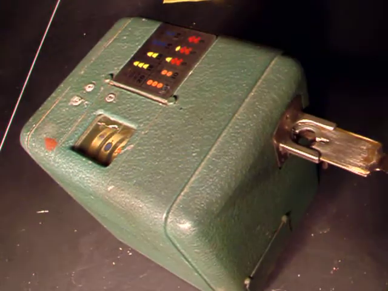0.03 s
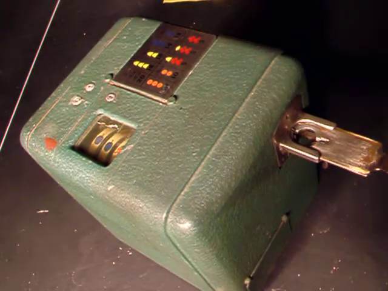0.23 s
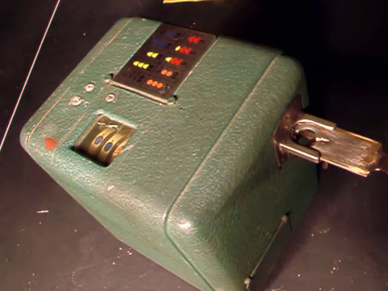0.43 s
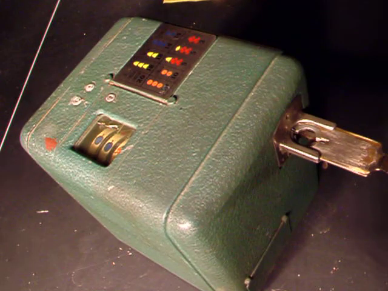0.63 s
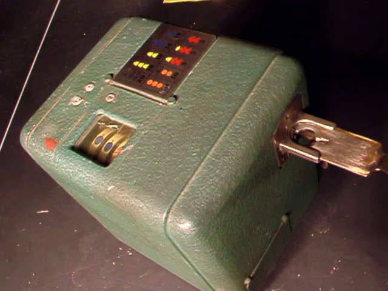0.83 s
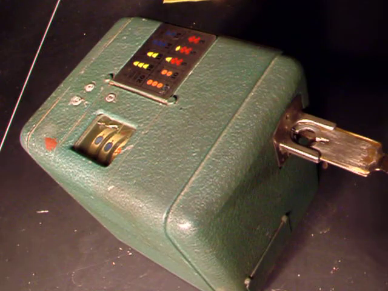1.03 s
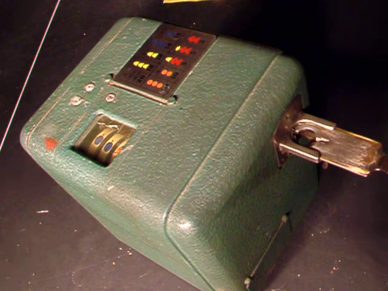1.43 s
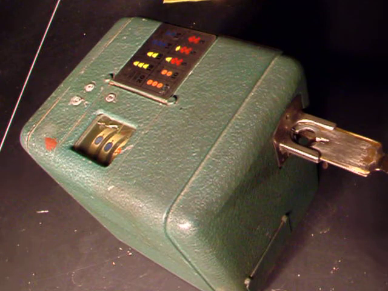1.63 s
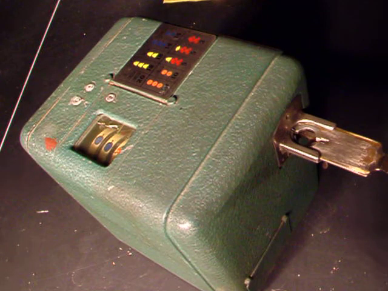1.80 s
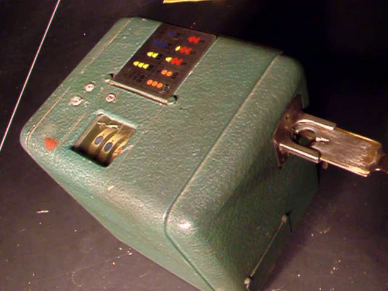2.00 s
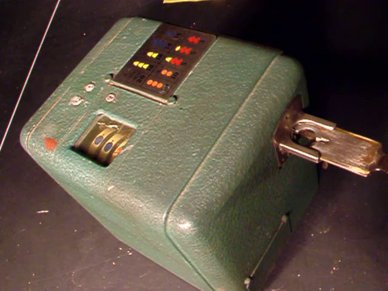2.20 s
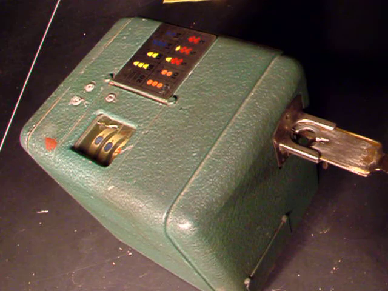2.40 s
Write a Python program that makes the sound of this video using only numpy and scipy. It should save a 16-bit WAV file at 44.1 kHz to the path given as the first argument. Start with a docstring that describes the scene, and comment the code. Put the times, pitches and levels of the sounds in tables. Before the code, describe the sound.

A small mechanical slot machine whirs softly, close by in a quiet room. At about 0.2 seconds its latch releases with a sharp double metal clack. The rattling whir swells around 0.8 seconds, catches lightly and dies away by 1.1. Seven ringing ticks follow, ever more widely spaced, the last near 2.3 seconds. Faint hiss and whine lie beneath, with a faint low hum growing toward the end.

```python
"""A small mechanical slot machine in a cast metal case, close by in a quiet room.
Its reels rub and rattle, making a whir. The lever latch lets go with a double clack,
and the whir swells and dies away. Three pawls (small arms that drop onto a toothed wheel)
then tick ever more slowly, each with its own ring, above a faint hiss, whine and hum."""
import sys
import numpy as np
from scipy import signal
from scipy.fft import rfft, irfft, next_fast_len
from scipy.io import wavfile
from scipy.ndimage import uniform_filter1d, map_coordinates

SR = 44100
rng = np.random.default_rng(int(sys.argv[2]) if len(sys.argv) > 2 else 0)


def materialize(psi):
    """Save the field psi as 16-bit PCM at rate SR to the path in sys.argv[1].

    A 1-D psi becomes a single channel; in a 2-D psi each row is a channel.
    """
    bounded = np.clip(np.atleast_2d(psi).T, -1, 1)
    quanta = np.round(bounded * 32767).astype(np.int16)
    wavfile.write(sys.argv[1], SR, quanta)


N = 112454


def amp(db):
    """Turn decibels into a number to multiply by."""
    return 10 ** (np.asarray(db) / 20)


def unit(x):
    """Scale x to an average power of 1."""
    return x / np.sqrt(np.mean(x ** 2) + 1e-20)


def along(points, hz):
    """Read between (frequency [Hz], value) points, with octaves evenly spaced."""
    frequencies, values = np.transpose(points)
    return np.interp(np.log(hz + 1), np.log(frequencies + 1), values)


def curve(rows):
    """Join (time [s], value) points with straight lines, one value per sample."""
    return np.interp(np.arange(N) / SR, *np.transpose(rows))


def wobble(rate):
    """A smooth curve through `rate` random values a second."""
    return map_coordinates(rng.standard_normal(int(N * rate / SR) + 4), [np.arange(N) * rate / SR])


def coloured(x, gain):
    """Filter x, making each frequency louder or softer by gain(hz)."""
    size = 2 * next_fast_len(len(x))
    hz = np.fft.rfftfreq(size, 1 / SR)
    cepstrum = irfft(np.log(np.maximum(gain(hz), 1e-6)), size)
    # folding it in half makes the filter ring after a sound, never before
    cepstrum[1:size // 2] *= 2
    cepstrum[size // 2 + 1:] = 0
    return irfft(rfft(x, size) * np.exp(rfft(cepstrum)), size)[:len(x)]


def evened(x, band_hz=130):
    """Make all bands of x equally strong, so that only the struck part shapes its tone."""
    power = abs(rfft(x, 2 * len(x))) ** 2
    grid = np.fft.rfftfreq(2 * len(x), 1 / SR)
    band_power = uniform_filter1d(power, size=max(1, int(band_hz / grid[1])))
    level = np.sqrt(abs(band_power) + 1e-9)
    return coloured(x, lambda hz: 1 / np.interp(hz, grid, level))


def metal_ring(force, peaks, bed):
    """Shaken metal rings at a few clear pitches (peaks) over a crowd of blended ones (the bed)."""
    def gain(hz, steepness=1.2):
        power = 0
        for centre, width, db in peaks:
            peak = (hz * width) ** 2 / ((centre ** 2 - hz ** 2) ** 2 + (hz * width) ** 2)
            power += amp(db) ** 2 * peak ** steepness
        return np.sqrt(power + amp(along(bed, hz)) ** 2)
    return coloured(force, gain)


def chatter(envelope):
    """Metal meets metal in a burst of tiny touches, whose strength follows the envelope."""
    x = rng.standard_normal(len(envelope)) * envelope
    for _ in range(6):  # even out the frequencies, then restore the shape in time
        spectrum = rfft(x)
        x = irfft(spectrum / (abs(spectrum) + 1e-12), len(x))
        x *= envelope / np.sqrt(abs(uniform_filter1d(x * x, size=64)) + 1e-12)
    return x / np.linalg.norm(x)


def room_tail(t, rise_s):
    """The room's echo: noise in which each frequency dies at its own speed."""
    # how long the room rings (frequency [Hz], time to fade by 60 dB [s])
    fade_times = [(200, 0.47), (600, 0.13), (1400, 0.24), (3700, .16), (6000, 0.17), (8500, 0.035)]
    hz, seconds, bands = signal.stft(rng.standard_normal(len(t)), SR, nperseg=256)
    fade = amp(-60 * seconds / along(fade_times, hz)[:, None])
    tail = signal.istft(bands * fade, SR, nperseg=256)[1][:len(t)]
    tail *= 1 - np.exp(-(t / rise_s) ** 2)
    return tail / np.linalg.norm(tail)


def blows(rows, peaks, bed, attack_s, release_s, room_db, room_rise_s):
    """Each blow chatters briefly against a metal part; the case and room ring on after it."""
    # ring of the case (pitch [Hz], width [Hz], level [dB])
    case_peaks = [(294, 11, -5), (783, 45, -0.5), (1115, 20, 2), (1580, 24, -1), (1610, 21, 8.5),
                  (1710, 20, -2.5), (1925, 22, -1), (2173, 18, -2), (2697, 47, -2), (4354, 13, 0),
                  (4877, 12, -8), (5330, 35, 5.5), (6050, 90, -5)]
    # blended ringing of case and room (frequency [Hz], level [dB])
    tail_bed = [(80, -31.5), (250, -13.5), (600, -14), (1000, -7), (2500, -7), (3700, -7.5), (6000, -4.5),
                (7200, -12), (8300, -22)]
    out, t = np.zeros(N + SR), np.arange(SR // 3) / SR
    # the struck part rings on in the tail too, more softly
    lingering = [(hz, width, db - 5) for hz, width, db in peaks] + list(case_peaks)
    for start_s, db, middle_db, treble_db, contact_s in rows:
        envelope = (1 - np.exp(-t / attack_s)) * np.exp(-np.maximum(t - contact_s, 0) / release_s)
        envelope *= amp(4.5 * np.exp(-t / 0.00089))  # the first touch is the hardest
        direct = metal_ring(evened(chatter(envelope)), peaks, bed)
        tail = metal_ring(evened(room_tail(t, room_rise_s)), lingering, tail_bed)
        # this blow's brightness (frequency [Hz], gain [dB])
        hardness = [(1200, 0.0033), (2000, middle_db), (3400, middle_db), (4800, treble_db)]
        blow = coloured(direct + amp(room_db) * tail, lambda hz: amp(along(hardness, hz)))
        out[round(start_s * SR):][:len(t)] += amp(db) * blow
    return out[:N]


def reels(rattles_per_s=500, low_hz=1500, stop_s=1.13):
    """The spinning reels rub and rattle in their bearings, and catch lightly as they slow."""
    # ring of the reels (pitch [Hz], width [Hz], level [dB])
    peaks = [(286, 23.5, 2), (773.5, 43, 6), (898, 20, 6), (1081, 69, -2), (1393, 25, -9), (1718, 67, -4.5),
             (1917, 13, 4.5), (2200, 77, 4), (2403, 66, 1.5), (3076, 37, 1), (3630, 110, -21),
             (4580, 190, -2.5), (5720, 63, -6), (6740, 150, -2.5)]
    # their blended ringing (frequency [Hz], level [dB])
    bed = [(60, -40), (220, -6), (400, -26), (620, -25), (900, -8.5), (2400, -8.5), (3700, -11.5),
           (5500, -10.5), (7000, -5.5), (8300, -23.5)]
    # loudness of the whir (time [s], level [dB])
    whir_levels = [(0, -43), (.12, -43.5), (.19, -44), (.33, -46), (.42, -47.5), (.5, -46.5), (.58, -48.5),
                   (.68, -45), (.77, -41), (.86, -40), (.94, -42.5), (.98, -45.5), (1.03, -56), (1.1, -55),
                   (1.2, -53.5)]
    # the whir's low part grows as the reels drag (time [s], gain [dB])
    drag = [(0, -2.5), (.6, 1.5), (.75, 2), (.93, 0), (1.05, 2.5)]
    # light catches (time [s], relative level [dB], middle [dB], treble [dB], contact length [s])
    catch_hits = [(.838, -45, -10.5, 11, 0.0096), (.906, -38, 4, 2.5, 0.0026), (1.001, -39.5, 3, 4, 0.0036)]
    knock_times = np.cumsum(rng.exponential(1 / rattles_per_s, size=1500))
    strengths = amp(2.5 * rng.standard_normal(len(knock_times)))
    knocks = np.bincount((knock_times * SR).astype(int), strengths, N)[:N]
    rubbing = rng.standard_normal(N)
    rattle = amp(-7) * unit(knocks - knocks.mean())
    flutter = amp(.9 * wobble(60))
    whir = unit(metal_ring((rubbing + rattle) * flutter, peaks, bed))
    low = signal.sosfiltfilt(signal.butter(2, low_hz, fs=SR, output="sos"), whir)
    whir = whir - low + amp(curve(drag)) * low
    catches = blows(catch_hits, peaks, bed,
                    attack_s=0.00185, release_s=0.0038, room_db=-3, room_rise_s=0.0053)
    fade_out = np.clip((stop_s - np.arange(N) / SR) / .05, 0, 1)
    return fade_out * amp(curve(whir_levels)) * whir + amp(33.5) * catches


def noise(spectrum):
    """Steady noise shaped by (frequency [Hz], relative level [dB]) points."""
    return unit(coloured(rng.standard_normal(N), lambda hz: amp(along(spectrum, hz))))


def background(hum_hz=118):
    """Room hiss, a faint wavering whine, and a low hum that grows along with a soft rumble."""
    # tone of the hiss (frequency [Hz], relative level [dB])
    hiss_shape = [(20, -11.5), (50, -18.5), (113, -17), (300, -16), (700, -16.5), (900, -13.5),
                  (1100, -16.5), (1400, -16.5), (2000, -16.5), (5200, -18.5), (6900, -16.5), (7800, -21),
                  (8900, -27)]
    # tones of the whine (pitch [Hz], level [dB])
    whine_tones = [(460, -68.5), (896, -63), (1340, -59.5), (1778, -67.5), (7115, -66.5), (7544, -68),
                   (8455, -80)]
    # growth of the hum (time [s], level [dB])
    hum_levels = [(0, -84), (1.2, -77), (1.7, -66.5), (2.1, -63.5), (2.5, -58.5)]
    # tone of the rumble (frequency [Hz], relative level [dB])
    rumble_shape = [(40, -5.5), (150, 3), (500, 2.5), (900, -5.5), (2000, -27)]
    t = np.arange(N) / SR
    whine = sum(amp(db + 0.38 * wobble(5.8)) * np.sin(2 * np.pi * hz * t + 0.4 * wobble(22))
                for hz, db in whine_tones)
    phase = 2 * np.pi * hum_hz * t + .2 * wobble(6)
    hum = np.sin(phase) + amp(-12.5) * np.sin(2 * phase)  # with a softer tone an octave up
    hiss = amp(-50.5) * noise(hiss_shape)
    rumble = amp(-0.5) * noise(rumble_shape)
    return hiss + np.sqrt(2) * whine + amp(curve(hum_levels)) * (np.sqrt(2) * hum + rumble)


def latch(boom_delay_s=.005, boom_rise_s=0.0036):
    """A small catch slips, the latch slams against its stop, and the case's panels boom just after."""
    # the two clacks (time [s], relative level [dB], middle [dB], treble [dB], contact length [s])
    slip_hit = [(.2055, -24.5, 1.5, -1.5, 0.0038)]
    slam_hit = [(.2387, -18.5, 0, -1, .005)]
    # ring of the catch and of the latch (pitch [Hz], width [Hz], level [dB])
    catch_peaks = [(730, 57, -1), (1610, 120, -2.5), (1800, 170, -0.5), (2320, 170, -6), (3580, 350, -3.5),
                   (5060, 74, 11.5), (5370, 220, 2), (6000, 150, 4), (6300, 120, -2)]
    latch_peaks = [(1420, 120, -2), (1787, 110, 9), (2480, 120, -2), (2640, 80, -6), (3020, 160, 0),
                   (3300, 40, 0), (3610, 91, 5), (4680, 120, -2), (4950, 81, -7), (5910, 150, 3),
                   (6700, 74, 0.5), (7700, 120, -7.5), (8330, 120, -11.5)]
    # blended ringing of both (frequency [Hz], level [dB])
    bed = [(60, -37), (200, -26), (400, -29), (900, -15), (2000, -21.5), (4100, -9.5), (6000, -5.5),
           (7300, -9.5), (8400, -23.5)]
    # booming panels (pitch [Hz], level [dB], time to fade by 60 dB [s])
    panels = [(127.6, -46, 0.14), (284, -34.5, 0.15), (543, -38, 0.14), (750, -35, 0.13), (762, -44, 0.13),
              (1670, -39, 0.27), (1730, -32, .2), (1906, -32, 0.19)]
    slip = blows(slip_hit, catch_peaks, bed,
                 attack_s=.0003, release_s=0.0088, room_db=-4, room_rise_s=0.003)
    slam = blows(slam_hit, latch_peaks, bed,
                 attack_s=0.00029, release_s=.005, room_db=-4.5, room_rise_s=0.0041)
    slam_s = slam_hit[0][0]
    t = np.maximum(np.arange(N) / SR - slam_s - boom_delay_s, 0)
    boom = sum(amp(db - 60 * t / fade_s) * np.sin(2 * np.pi * hz * t + .5 * wobble(70))
               for hz, db, fade_s in panels)
    boom *= 1 - np.exp(-(t / boom_rise_s) ** 2)
    return amp(33.5) * (slip + slam) + boom


def pawls(tooth_width_hz=130):
    """Each pawl drops from tooth to tooth; pawl, tooth and case ring together."""
    # pawl ticks (time [s], relative level [dB], middle [dB], treble [dB], contact length [s],
    # tooth pitch [Hz], tooth level [dB], which pawl)
    ticks = [(1.1011, -27.5, -3, -2.5, 0.0042, 5030, 1.5, "first"),
             (1.2317, -27, 0, 0.5, 0.0028, 5530, 6, "second"),
             (1.3596, -24.5, 2.5, 2.5, 0.0059, 4480, 11, "third"),
             (1.4985, -25, -0.5, -1.5, .0045, 4710, 2, "first"),
             (1.7210, -23, -1.5, -2.5, .004, 4900, -1.5, "second"),
             (1.9589, -22.5, .5, 3.5, .0025, 3250, 5, "third"),
             (2.2722, -21.5, -1.5, -3, 0.004, 4640, 6.5, "first")]
    # ring of each pawl, by name (pitch [Hz], width [Hz], level [dB])
    pawl_peaks = { "first": [(920, 26, 4.5), (1063, 73, 5), (1364, 77, 4.5), (1633, 35, 4.5),
                  (1760, 200, 0.5), (2178, 52, 8), (2406, 56, 4), (2846, 63, -5), (3750, 120, -1),
                  (4590, 160, 7.5), (5470, 110, 4), (5630, 140, 2), (6170, 52, 3.5)],
                  "second": [(730, 54, -11), (1040, 100, 2), (1100, 61, 6.5), (1676, 28, 8), (1840, 58, 2),
                  (2160, 59, 3.5), (2650, 140, 3), (3720, 57, -5.5), (4170, 90, -9.5), (4600, 190, -5),
                  (5330, 130, 2), (5570, 66, 5), (5800, 100, 9), (6420, 47, 9.5)], "third": [(1086, 80, 4),
                  (1150, 80, 5), (1680, 25, -6), (1795, 80, 0.5), (2186, 78, 5.5), (2518, 80, 4.5),
                  (2800, 130, -3.5), (3200, 280, -2), (4360, 130, 5.5), (4470, 110, 3.5), (4850, 71, 6),
                  (5370, 84, -2), (5600, 42, 5), (6290, 150, -1.5)]}
    # their blended ringing (frequency [Hz], level [dB])
    bed = [(80, -60), (250, -17), (400, -30), (650, -42), (1000, -30.5), (3800, -17), (6000, -14.5),
           (7200, -9.5), (8300, -50.5)]
    out = np.zeros(N)
    for *hit, tooth_hz, tooth_db, name in ticks:
        peaks = list(pawl_peaks[name]) + [(tooth_hz, tooth_width_hz, tooth_db)]
        out += blows([hit], peaks, bed,
                     attack_s=0.00016, release_s=0.0022, room_db=-3.5, room_rise_s=0.0015)
    return amp(33.0) * out


def scene():
    """The machine and its room, in one channel."""
    return (reels() + background() + latch() + pawls())[None]


def record(dry, top_hz=9100, offset=.0031):
    """The recorder cuts the highest treble and shifts the wave slightly off zero."""
    # steep fall of the treble (frequency [Hz], gain [dB])
    treble_loss = [(7800, 0.5), (8300, -4.5), (8550, -6.5), (8800, -15.5), (9100, -27.5)]
    size = next_fast_len(N + SR // 2)
    hz = np.fft.rfftfreq(size, 1 / SR)
    gain = amp(along(treble_loss, hz)) * (hz < top_hz)
    return offset + irfft(rfft(dry, size) * gain, size)[:, :N]


dry = scene()
out = record(dry)
materialize(out)
```